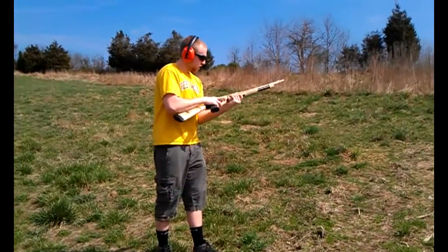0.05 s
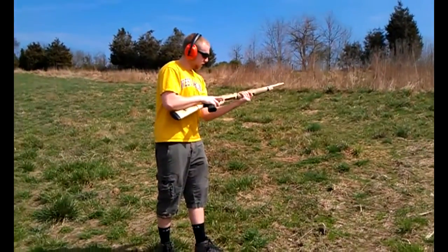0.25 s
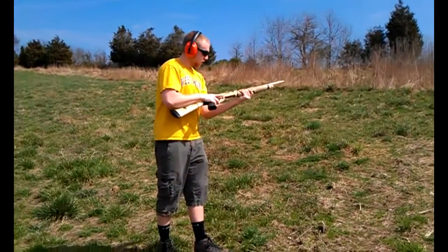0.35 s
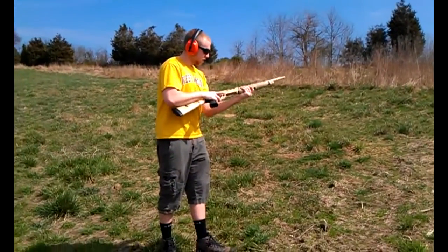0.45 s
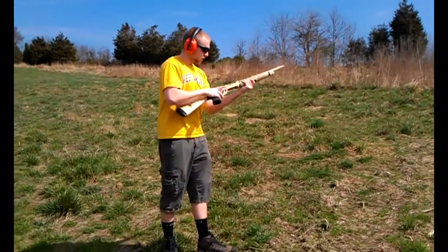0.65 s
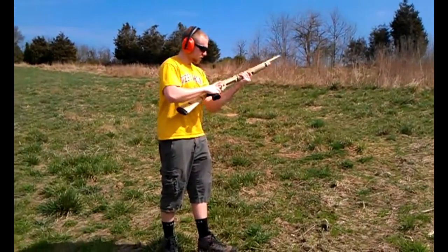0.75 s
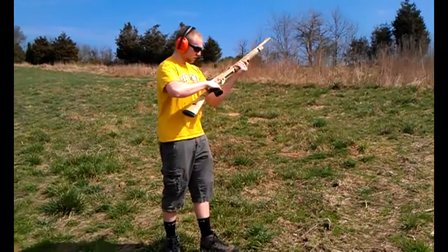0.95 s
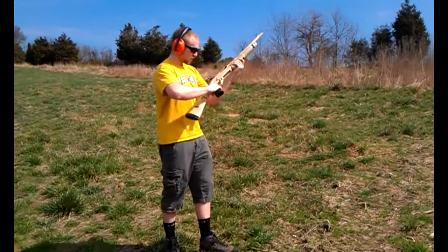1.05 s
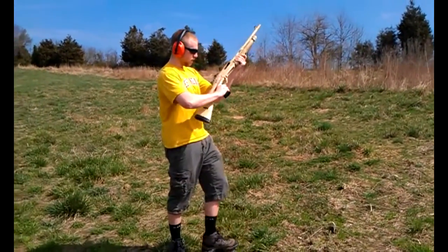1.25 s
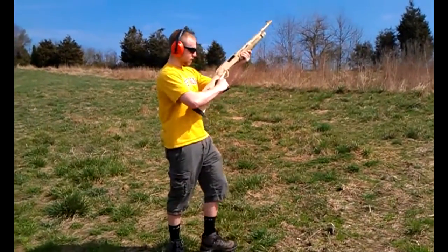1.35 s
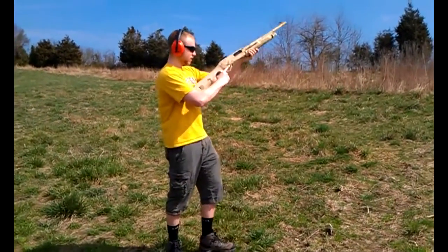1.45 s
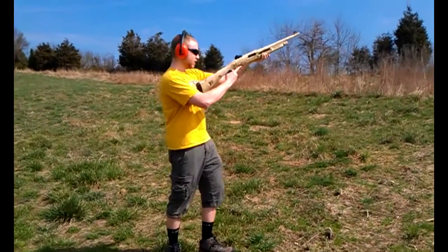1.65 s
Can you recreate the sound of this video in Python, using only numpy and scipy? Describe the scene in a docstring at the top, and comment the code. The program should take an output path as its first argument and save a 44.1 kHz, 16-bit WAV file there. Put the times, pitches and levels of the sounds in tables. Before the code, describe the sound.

A shotgun's action clatters once, loud and metallic, followed by weak clicks and faint birdsong.

```python
"""A shotgun's action is worked in an open field: steel parts slide, knock and slam home in one quick
clatter. Each blow ticks, makes the steel ring and knocks the stock (the gun's shoulder piece).
A few weak clicks and some rustling follow as the gun is raised. A far bird repeats a falling whistle
over a low distant drone, faint hiss and light wind. The grass scatters the sound of gun and bird,
and the tree line returns a faint echo."""
import sys
import numpy as np
from scipy import signal
from scipy.fft import rfft, irfft
from scipy.io import wavfile
from scipy.ndimage import uniform_filter1d

SR = 44100
rng = np.random.default_rng(int(sys.argv[2]) if len(sys.argv) > 2 else 0)


def transcribe(u):
    """Save the signal u as a 16-bit wav file named by the first command-line argument.

    u: samples, shape (n,) or (channels, n), limited to [-1, 1]; the rate is SR.
    q: integer samples, one column per channel.
    """
    v = np.clip(np.atleast_2d(u).T, -1, 1)
    q = np.round(v * 32767).astype(np.int16)
    wavfile.write(sys.argv[1], SR, q)


N = 74970  # 1.7 s

# A spectrum says how strong each frequency is compared with the others.
# Spectrum of the distant drone: f/Hz, level/dB
DRONE_SPECTRUM = [(30, -22), (85, -14.5), (120, -1), (190, -12.5), (255, 4), (300, -8.5), (360, -6),
                  (470, -17.5), (900, -33), (3000, -57)]
# Loudness of the drone over time: t/s, level/dB
DRONE_LEVELS = [(0, -51), (.2, -48.5), (.42, -47.5), (.65, -53.5), (1.1, -56.5), (1.7, -57)]
# Spectrum of the field's hiss: f/Hz, level/dB
HISS_SPECTRUM = [(100, -0.5), (600, -0.5), (1200, -2.5), (2500, -4.5), (4500, -6), (7200, -2), (10000, -10),
                 (15000, -8.5), (16000, -13.5)]
# Spectrum of wind on the microphone: f/Hz, level/dB
WIND_SPECTRUM = [(15, -11), (40, -1.5), (70, -1), (140, -11.5), (500, -49)]
# Puffs of that wind: t/s, length/s, level/dB
WIND_PUFFS = [(.935, 0.063, -50.5), (1.04, 0.044, -52), (1.185, 0.03, -57)]
# The bird's whistles: t/s, level/dB
BIRD_WHISTLES = [(.068, -61), (0.637, -58.5), (0.923, -55.5), (1.220, -53), (1.521, -56)]
# Loudness within one whistle: t/s, level/dB
WHISTLE_LEVELS = [(0, -3.5), (.012, -3), (.028, 0), (.045, -2.5), (.08, -10), (.105, -16.5)]
# Rustles of cloth and hands: t/s, length/s, level/dB
CLOTH_RUSTLES = [(.92, .09, -61.5), (1.31, 0.064, -59), (1.44, .05, -66), (1.53, 0.18, -61)]
# Weak clicks of the gun: t/s, ring level/dB, f/Hz, fade time/s, snap level/dB, knock level/dB
HANDLING_CLICKS = [(0.7363, -35, 4200, 0.026, -40, -75), (0.7371, -45, 3010, 0.038, -47, -77),
                   (.7696, -45, 702, 0.038, -33, -43), (.8845, -44, 520, .018, -70, -67),
                   (1.092, -50.5, 1080, 0.012, -54, -70), (1.2891, -51.5, 3770, 0.016, -30, -75)]
# Spectrum of a click's buzz: multiple of the click's frequency, level/dB
CLICK_SPECTRUM = [(.2, -29), (.7, -7), (.85, -9), (1, 3), (1.25, -8.5), (2.2, -10), (4, -32), (12, -48)]
# Spectrum of the stock's dull thud: f/Hz, level/dB
THUD_SPECTRUM = [(200, -36), (480, -14), (680, -4), (900, -5), (1120, 2.5), (1400, 4), (1750, -0.5),
                 (2200, -3.5), (2800, -1), (5000, -19)]
# Hollow tones of the stock: f/Hz, level/dB, fade time/s
STOCK_TONES = [(630, -15, 0.048), (724, -7, 0.04), (832, -10.5, 0.039), (1120, -3.5, 0.047),
               (1290, -10.5, 0.026), (1771, -9.5, 0.044), (2088, -14.5, 0.098)]
# Longer tones of the barrel and the gun's steel body: f/Hz, gain/dB, fade time/s
BARREL_TONES = [(2810, 9.5, 0.13), (3075, 2.5, 0.042), (3697, -1, 0.032), (4304, -2, .09),
                (4580, -12, 0.12), (4985, -2, .09), (5600, -11, 0.041), (6700, -28, 0.11),
                (6740, -11, 0.17), (6920, -20, 0.16), (7640, -1, 0.05), (10320, -2, 0.04),
                (11500, -2, 0.098), (11760, -3, 0.14)]
# Spectrum of the ringing steel parts: f/Hz, level/dB
STEEL_SPECTRUM = [(400, -27.5), (1200, -24), (2200, -22), (3300, -11), (4300, -1.5), (5300, -4.5),
                  (7400, 2.5), (8600, -2.5), (9900, -8), (11000, -20), (13500, -30), (16000, -45)]
# Spectrum of the high fizz of sliding steel: f/Hz, level/dB
FIZZ_SPECTRUM = [(9000, -37), (12300, -5.5), (13200, -6), (15500, -7), (16500, -4)]
# Parts sliding between the blows: t/s, length/s, scrape level/dB, fizz level/dB
ACTION_SLIDES = [(0.196, 0.017, -46, -66), (0.234, 0.014, -28.5, -59), (0.28, 0.024, -35.5, -64),
                 (0.312, 0.0458, -26.5, -33.5), (0.356, 0.0197, -33, -45)]
# Blows of steel on steel: t/s, tick level/dB, f/Hz of the struck part, ring level/dB, knock level/dB
ACTION_BLOWS = [(0.179, -23.5, 5160, -33, -53), (0.1969, -31, 6500, -34.5, -41.5),
                (0.2073, -22, 7400, -20, -32), (0.2086, -19, 6140, -21, -32.5),
                (.2109, -19, 7340, -22, -35), (0.227, -38, 7500, -27.5, -52), (0.2339, -25, 6000, -22, -43),
                (.2430, 1.5, 7500, -15, -44.5), (0.2466, -13.5, 4600, -16.5, -35),
                (0.2481, -7, 7760, -15, -29), (0.273, -14.5, 5500, -37, -31.5),
                (0.276, -14.5, 5150, -22.5, -32.5), (.2864, 1.5, 7880, -18.5, -28.5),
                (0.2884, -23, 8700, -22.5, -40), (0.2959, 0, 6670, -10, -58),
                (0.3131, -2.5, 6340, -16, -42), (0.3148, -22, 5610, -12.5, -28),
                (.3222, -1.5, 7210, -11, -40), (.3270, -10, 7240, -13, -31.5),
                (0.3278, -12, 7110, -12.5, -39), (0.3373, -5.5, 7580, -9.5, -27.5),
                (.3390, -12, 4400, -12, -24.5), (.3450, -18, 7200, -12, -27.5),
                (0.3481, -17, 4230, -10, -27), (.3575, -31, 4980, -37, -34.5)]


def amp(db):
    """Turns decibels into a number to multiply a sound by."""
    return 10 ** (np.asarray(db) / 20)


def unit(x):
    """Scales a signal to an average strength (rms) of 1."""
    return x / np.sqrt(np.mean(x ** 2) + 1e-20)


def add(mix, start_s, sound):
    """Adds a sound into the mix at a given time."""
    part = mix[max(0, round(start_s * SR)):][:len(sound)]
    part += sound[:len(part)]


def coloured(x, spectrum, scale=1):
    """Shapes a signal with a spectrum whose frequencies are multiplied by scale."""
    hz, db = np.transpose(spectrum)
    bins = np.fft.rfftfreq(len(x), 1 / SR) / scale
    gain = amp(np.interp(np.log(bins + 1e-6), np.log(hz), db))
    return unit(irfft(rfft(x) * gain, len(x)))


def noise(spectrum, size=N, scale=1):
    """Noise with a given spectrum."""
    return coloured(rng.standard_normal(size), spectrum, scale)


def dense_tones(spectrum, size, scale=1):
    """Many close tones at once, made by evening out the loudness of noise."""
    x = noise(spectrum, size, scale)
    power = abs(uniform_filter1d(x ** 2, size=96))
    return unit(x / np.sqrt(power + 1e-6))


def fade(t, fade_s):
    """Dies away by 60 dB over the fade time."""
    return np.exp(-np.log(1000) * t / fade_s)


def tone(t, hz, fade_s):
    """One dying tone that starts at a random point of its wave."""
    return fade(t, fade_s) * np.sin(2 * np.pi * (hz * t + rng.random()))


def swells(rows):
    """A loudness curve with one soft rise and fall per row."""
    level = np.zeros(N)
    for start_s, length_s, db in rows:
        add(level, start_s, amp(db) * np.hanning(round(length_s * SR)) ** .5)
    return level


def drone():
    """A low distant drone swells a little, then sinks."""
    level_db = np.interp(np.arange(N) / SR, *np.transpose(DRONE_LEVELS))
    return amp(level_db) * noise(DRONE_SPECTRUM)


def hiss(level_db=-59, flicker_db=1):
    """The field's faint hiss flickers in small patches of pitch and time."""
    grid = signal.stft(noise(HISS_SPECTRUM), nperseg=512)[2]
    patches = uniform_filter1d(rng.standard_normal(grid.shape), size=12, axis=0)
    patches = unit(uniform_filter1d(patches, size=8, axis=1))
    patchy = signal.istft(grid * amp(flicker_db * patches), nperseg=512)[1][:N]
    return amp(level_db) * unit(patchy)


def wind(breeze_db=-77):
    """A light breeze and a few puffs rumble on the microphone."""
    return (amp(breeze_db) + swells(WIND_PUFFS)) * noise(WIND_SPECTRUM)


def bird(length_s=0.12, glide_hz=2000, sag_hz_per_s=6000):
    """Each whistle falls in pitch: a quick flick, a slower swoop, then a steady glide."""
    out, t = np.zeros(N), np.arange(0, length_s, 1 / SR)
    flick_hz = 1428 * np.exp(-t / 0.00255)
    swoop_hz = 846 * np.exp(-t / 0.022)
    hz = flick_hz + swoop_hz + glide_hz - sag_hz_per_s * t
    level = amp(np.interp(t, *np.transpose(WHISTLE_LEVELS))) * np.minimum(t / 0.00067, 1)
    for start_s, db in BIRD_WHISTLES:
        cycles = np.cumsum(hz * rng.uniform(.99, 1.01)) / SR
        add(out, start_s, amp(db) * level * np.sin(2 * np.pi * cycles))
    return out


def field_echo(x, grass_db=-19.5, trees_db=-46, delay_s=0.218, smear_s=0.012):
    """The grass scatters a little sound, then the trees send back one smeared echo."""
    t = np.arange(SR // 2) / SR
    reflections = noise([(1000, -2), (7000, 0.0035)], len(t))  # slightly weaker lows
    grass = reflections * fade(t, fade_s=0.34) * np.minimum(t / 0.0063, 1)
    trees = reflections * np.exp(-((t - delay_s) / smear_s) ** 2)
    echo = amp(grass_db) * grass / np.linalg.norm(grass) + amp(trees_db) * trees / np.linalg.norm(trees)
    return signal.fftconvolve(x, echo)[:N]


def rustle():
    """Cloth and hands rub in soft swells of bright noise, which borrows the steel's spectrum."""
    return swells(CLOTH_RUSTLES) * noise(STEEL_SPECTRUM)


def tick(t, hz, cycles_to_peak=1.33):
    """The first touch of steel on steel lasts only a few waves."""
    age = t * hz / cycles_to_peak
    return (age * np.exp(1 - age)) ** 3 * np.sin(2 * np.pi * hz * t)


def knock(t, thud_db=-10, rise_s=0.0006):
    """The stock answers a blow with a few hollow tones and a dull thud."""
    hollow = sum(amp(db) * tone(t, hz, fade_s) for hz, db, fade_s in STOCK_TONES)
    thud = amp(thud_db) * dense_tones(THUD_SPECTRUM, len(t)) * fade(t, fade_s=0.061)
    return (hollow + thud) * (1 - np.exp(-t / rise_s))


def clicks(snap_hz=6500, buzz_db=-4, steel_db=-10.5):
    """The gun clicks as it is handled: each time a short ring, a snap and a faint knock."""
    out, t = np.zeros(N), np.arange(4096) / SR
    for start_s, ring_db, hz, fade_s, snap_db, knock_db in HANDLING_CLICKS:
        ring = tone(t, hz, fade_s)
        ring += amp(buzz_db) * dense_tones(CLICK_SPECTRUM, len(t), hz) * fade(t, fade_s)
        steel = dense_tones(STEEL_SPECTRUM, len(t)) * fade(t, min(fade_s, 0.028))
        snap = tick(t, snap_hz) + amp(steel_db) * steel
        add(out, start_s, amp(ring_db) * ring + amp(snap_db) * snap + amp(knock_db) * knock(t))
    return out


def barrel(x):
    """The barrel and the steel body ring on after each contact in x."""
    t = np.arange(SR // 3) / SR
    ring = np.zeros(len(t))
    for hz, db, fade_s in BARREL_TONES:
        gain = amp(db) * 2 * np.log(1000) / (fade_s * SR)  # a steady tone at hz comes back scaled by db
        ring += gain * fade(t, fade_s) * np.cos(2 * np.pi * hz * t)
    return x + signal.fftconvolve(x, ring)[:N]


def slides(catches_per_s=2500, spread_db=3, stock_db=-12, edge_s=0.008):
    """Sliding steel catches in many tiny jolts, which also sound in the stock."""
    out, t = np.zeros(N), np.arange(N) / SR
    jolts = rng.choice([-1, 1], N) * (rng.random(N) < catches_per_s / SR)
    jolts = jolts * amp(spread_db * np.minimum(rng.exponential(1, N), 2))
    scrape = coloured(jolts, STEEL_SPECTRUM) + amp(stock_db) * coloured(jolts, THUD_SPECTRUM)
    fizz = coloured(jolts, FIZZ_SPECTRUM)
    for start_s, length_s, scrape_db, fizz_db in ACTION_SLIDES:
        inside_s = np.minimum(t - start_s, start_s + length_s - t)
        level = np.clip(inside_s / edge_s + .5, 0, 1)
        out += level * (amp(scrape_db) * scrape + amp(fizz_db) * fizz)
    return out


def blows(rattle_db=-30.5, ping_db=-3, rise_s=0.00027):
    """Each blow ticks, pings the struck part, rings the steel briefly and knocks the stock."""
    out, t = np.zeros(N), np.arange(4096) / SR
    ring_fade = fade(t, fade_s=0.016) + amp(rattle_db) * fade(t, fade_s=0.05)
    for start_s, tick_db, hz, ring_db, knock_db in ACTION_BLOWS:
        steel = dense_tones(STEEL_SPECTRUM, len(t)) * ring_fade
        ping = amp(ping_db) * tone(t, hz, fade_s=0.019)
        ring = (steel + ping) * (1 - np.exp(-t / rise_s))
        add(out, start_s, amp(tick_db) * tick(t, hz) + amp(ring_db) * ring + amp(knock_db) * knock(t))
    return out


def scene(bird_echo_boost_db=12):
    """The gun nearby and the bird far off in the open field, as one channel."""
    gun = barrel(blows() + slides()) + clicks() + rustle()
    song = bird()
    echoes = field_echo(gun + amp(bird_echo_boost_db) * song)
    return (gun + song + echoes + drone() + hiss() + wind())[None]


def record(dry, ceiling=0.73, cutoff_hz=15950):
    """Rounds off the loudest peaks, then cuts the very highest treble."""
    rounded = dry / (1 + (dry / ceiling) ** 6) ** (1 / 6)
    lowpass = signal.firwin(511, cutoff_hz, window=("kaiser", 9), fs=SR)
    return signal.oaconvolve(rounded, lowpass[None], "same")


dry = scene()
out = record(dry)
transcribe(out)
```